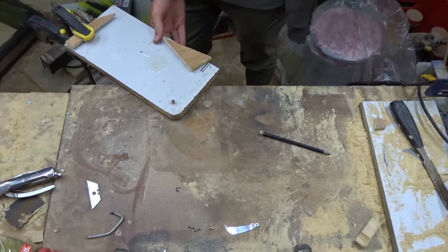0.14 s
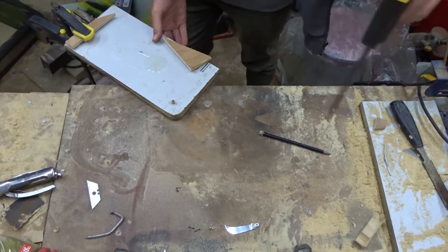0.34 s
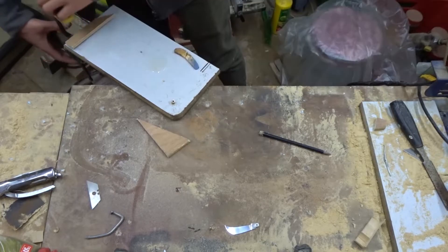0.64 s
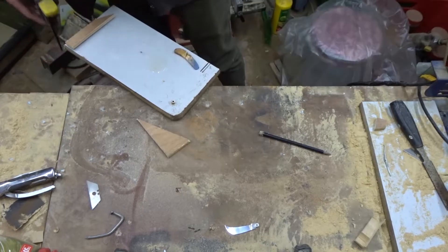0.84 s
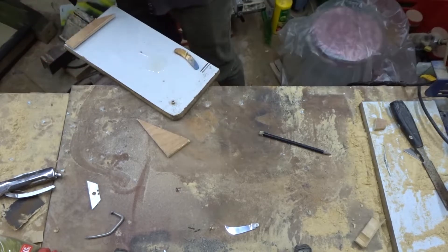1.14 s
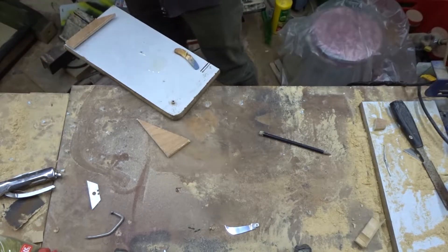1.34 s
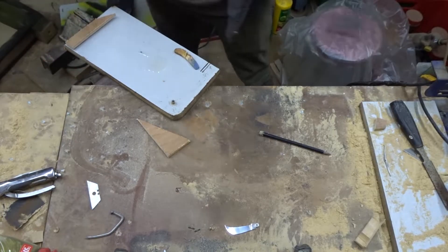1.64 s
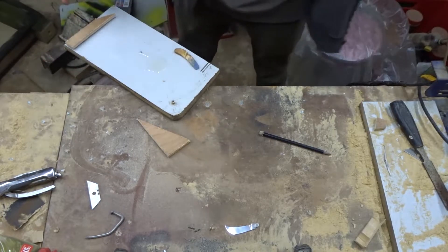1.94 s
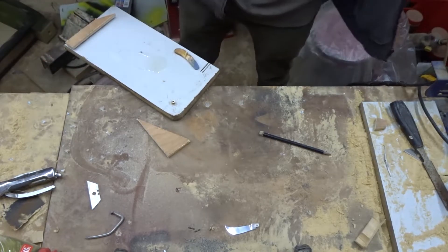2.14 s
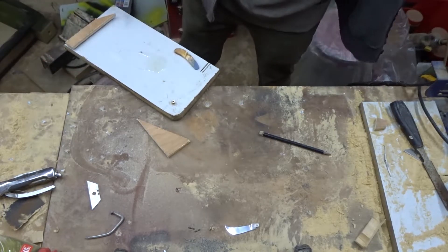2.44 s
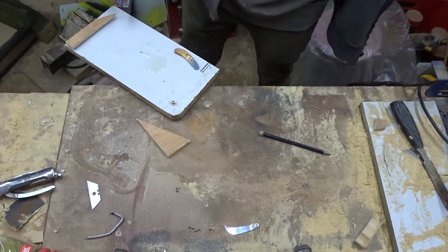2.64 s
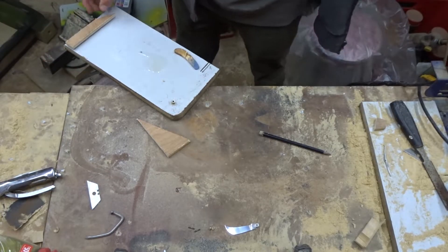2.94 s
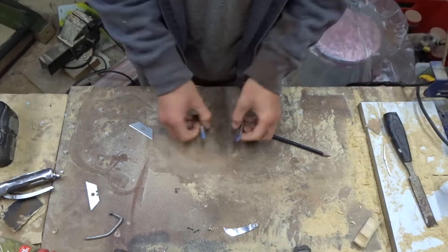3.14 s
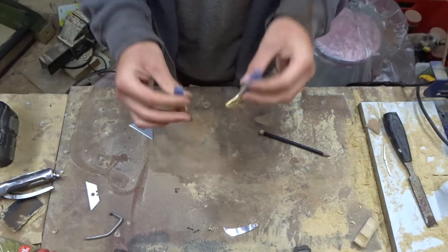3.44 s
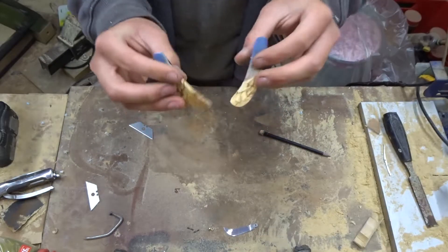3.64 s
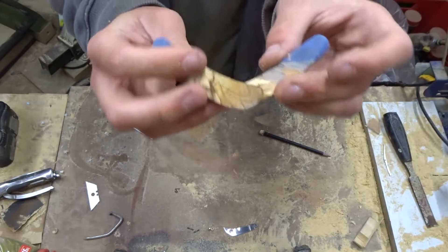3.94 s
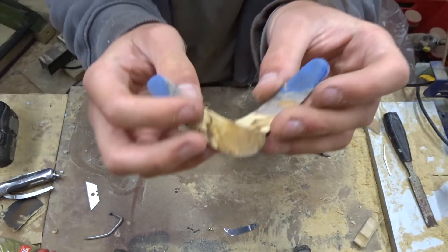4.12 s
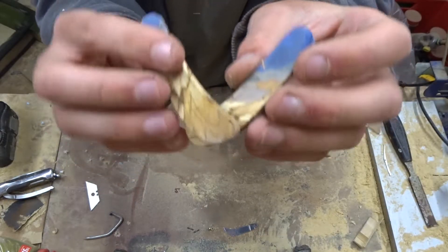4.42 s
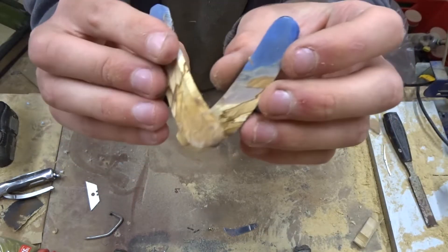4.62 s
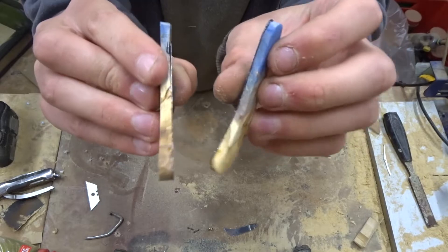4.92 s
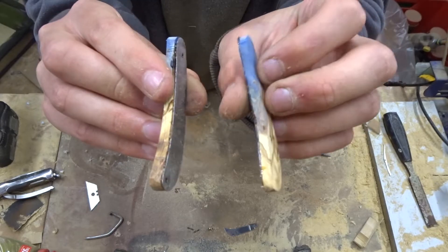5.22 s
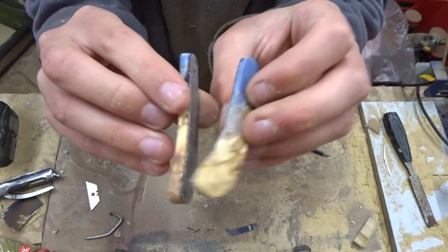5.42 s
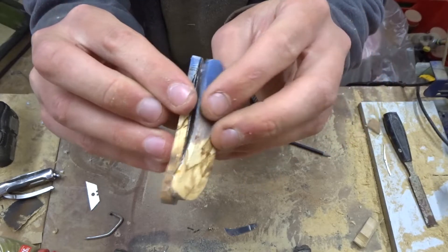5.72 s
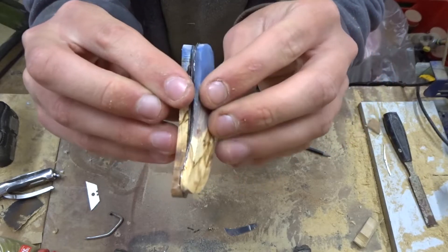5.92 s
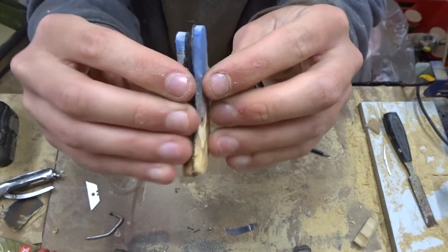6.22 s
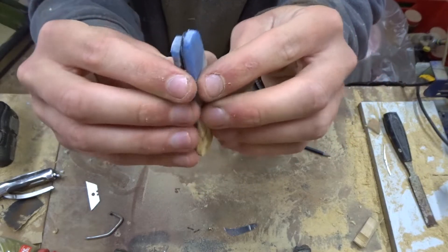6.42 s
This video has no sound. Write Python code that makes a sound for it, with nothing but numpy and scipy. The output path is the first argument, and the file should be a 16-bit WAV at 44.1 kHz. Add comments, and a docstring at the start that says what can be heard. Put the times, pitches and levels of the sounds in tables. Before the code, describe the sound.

In a small workshop, a clamp snaps, wood rattles down hard on a bench, then faint close clicks of small wooden slips over room air.

```python
"""A small workshop: clamps and pieces of wood are dropped on a workbench; each lands, chatters and shakes the bench.
Later two thin slips of wood are rubbed and clicked together close to the microphones, over the quiet room air.
Blows and strokes are random tiny contacts that ring a filter of resonances; the bench adds decaying low modes.
Shaped noise makes the air and the brush of fingers, a wavering sine a faint squeak, sparse echoes the room."""
import sys
import numpy as np
from scipy import signal
from scipy.io import wavfile
from scipy.ndimage import uniform_filter1d

SR = 44100
rng = np.random.default_rng(int(sys.argv[2]) if len(sys.argv) > 2 else 0)


def store_pcm(level_fs):
    """Save levels as 16-bit WAV."""
    pcm = np.round(np.clip(level_fs, -1, 1) * 32767).astype(np.int16)
    wavfile.write(sys.argv[1], SR, np.atleast_2d(pcm).T)


def voltage_ratio(decibels):
    """Convert decibels (scalar or array-like) to amplitude ratios, 20 dB per decade."""
    exponent = np.asarray(decibels, float) / 20
    return 10 ** exponent


N = 289737
BENCH_STOP_S = 3.186  # the bench sound stops short and the air changes colour


def evened(x):
    """Scales to rms 1."""
    return x / np.sqrt(np.mean(x ** 2) + 1e-20)


def read(points, hz):
    """Reads a table on a log-frequency axis."""
    f, value = np.transpose(points)
    return np.interp(np.log(hz + 1), np.log(f + 1), value)


def add(mix, s, sound):
    """Mixes a sound in at time s."""
    part = mix[..., round(s * SR):][..., :sound.shape[-1]]
    part += sound[..., :part.shape[-1]]


def response(rings, colour, broad_db):
    """Causal impulse response of resonances standing on a broad colour."""
    hz = abs(np.fft.fftfreq(8192, 1 / SR))
    power = voltage_ratio(2 * (read(colour, hz) + broad_db)) + 1e-9
    for f, width_hz, db in rings:
        power += voltage_ratio(2 * db) / (1 + (2 * (hz - f) / width_hz) ** 2) ** 2
    log_gain = np.log(power) / 2
    spectrum = np.exp(log_gain - 1j * signal.hilbert(log_gain).imag)  # minimum phase
    return np.fft.ifft(spectrum).real[:4096]


def contacts(count, per_s, spread_db):
    """Tiny contacts at random moments, of random sign; a few are large."""
    when, size, sign = rng.random((count, 3)).T
    return (when < per_s / SR) * voltage_ratio(-spread_db * np.log(size + .02)) * np.sign(sign - .5)


def panned(x, pan_db):
    """Two channels, the nearer one louder; close reflections reach them unlike, as a short treble scatter."""
    t = np.arange(2500) / SR
    scatter = rng.standard_normal(len(t)) * voltage_ratio(-60 * t / .04)
    highpass = signal.butter(1, 3000, "high", fs=SR)
    scatter = signal.lfilter(*highpass, scatter / np.linalg.norm(scatter))
    side = voltage_ratio(0.24) * signal.fftconvolve(x, scatter)[:len(x)]
    return np.array([x + side, x - side]) * voltage_ratio(np.array([[pan_db], [-pan_db]]) / 2)


def drag(rows, ring, per_s, pan_db):
    """Grit slips under a stroke: dense contacts through the body; gives start and sound."""
    s, db = np.transpose(rows)
    t = np.arange(s[0], s[-1], 1 / SR)
    grit = signal.fftconvolve(contacts(len(t), per_s, spread_db=1.0), ring)[:len(t)]
    stroke = evened(grit) * voltage_ratio(np.interp(t, s, db)) * signal.windows.tukey(len(t), .02)
    return s[0], panned(stroke, pan_db)


def bench_ring(hardness_hz, free, rock_t60):
    """The bench top rocks for a moment after a push; a soft push reaches only the low modes."""
    # bench modes: f/Hz (drawn within 1.5 %), level/dB, free t60/s
    modes = [(30, -27, .3), (50, -22.5, .2), (82.2, -11.5, 0.36), (101, -2.5, 0.2), (128, -4.5, 0.25),
             (161, -11.5, 0.29), (197, -16, 0.45), (260, -10.5, 0.095), (300, -4, 0.32), (348, -4.5, 0.38),
             (436, -10, .2), (580, -11, 0.28), (714, -20.5, .15)]
    t = np.arange(SR // 2) / SR
    ring = np.zeros(len(t))
    for hz, db, t60 in modes:
        share, turn = rng.random(2)
        decay = voltage_ratio(db - 60 * t / (t60 * free))
        tone = np.sin(2 * np.pi * hz * (.985 + .03 * turn) * t)
        ring += decay * tone * (0.6 + share) / (1 + (hz / hardness_hz) ** 2)
    ring *= 1 - np.exp(-t * hardness_hz)  # soft pushes build up slowly
    rocking = contacts(len(t), per_s=130, spread_db=1.5) * voltage_ratio(-60 * t / rock_t60)
    rocking[0] = 2.2  # the push itself
    ring = signal.fftconvolve(rocking, ring)[:len(t)]
    return ring / abs(ring).max()


def blows(rows, body, broad_db, per_s, spread_db, touch, split_hz, rise_s, pan_db, thump_db, treble_life):
    """Each blow is a chatter of contacts that holds, dies and rings the object, and a thump in the bench."""
    out = np.zeros((2, N))
    ring = response(*body, broad_db)
    lowpass = signal.butter(2, split_hz, fs=SR)
    t = np.arange(SR // 3) / SR
    for s, level_db, hold_s, t60, treble_db in rows:
        fade_db = -60 * np.maximum(t - hold_s, 0) / t60
        shape = voltage_ratio(fade_db) * (1 - np.exp(-t / rise_s))
        chatter = contacts(len(t), per_s, spread_db) * shape
        chatter[0] = touch  # first touch
        # hard contacts are bright, soft ones dull; treble dies sooner
        dull = signal.lfilter(*lowpass, chatter)
        treble_gain = voltage_ratio(treble_db + fade_db * (1 / treble_life - 1))
        sound = signal.fftconvolve(dull + treble_gain * (chatter - dull), ring)
        sound *= voltage_ratio(level_db) * np.linalg.norm(shape) / np.linalg.norm(sound)
        add(out, s, panned(sound, pan_db))
        thump = bench_ring(hardness_hz=400, free=0.74, rock_t60=t60 + 3 * hold_s)
        add(out, s, voltage_ratio(level_db + thump_db) * thump)
    return out


def patchy_noise():
    """Two-channel noise spectrum, alike in the bass and unlike in the treble, and slow random patches."""
    # left-right likeness of the noise: f/Hz, coherence (0 to 1)
    likeness = [(60, 0.98), (170, 0.94), (480, 0.15), (1360, 0.0027), (3860, 0.015), (10900, 0)]
    frames, hz = N // 256 + 5, np.fft.rfftfreq(1024, 1 / SR)
    a, b, c, d, patches = rng.standard_normal((frames, 513, 5)).T
    patches = uniform_filter1d(patches, size=8, axis=0)
    patches = evened(uniform_filter1d(patches, size=12, axis=1))
    same = np.clip(read(likeness, hz), -1, 1)[:, None]
    left = a + 1j * b
    right = same * left + np.sqrt(1 - same ** 2) * (c + 1j * d)
    return hz, np.arange(frames) * 256 / SR, np.array([left, right]), patches


def noise_sound(spectrum):
    """Overlap-adds a noise spectrum into sound of rms 1."""
    return evened(signal.istft(spectrum, nperseg=1024, noverlap=768)[1][:, :N])


def air(hz, t, noise, patches):
    """Room air and microphone hiss: coloured, slightly patchy noise."""
    # air colour up to the bench stop: f/Hz, relative level/dB per Hz
    early_colour = [(12, -37), (20, -6), (93, -7.5), (158, -11.5), (506, -12), (1010, -18), (1280, -18),
                    (1500, -17), (3680, -23), (3990, -22.5), (4670, -24), (10300, -30), (11200, -37.5),
                    (14600, -64), (22000, -120)]
    # air colour after it: f/Hz, relative level/dB per Hz
    late_colour = [(12, -30), (20, 0), (42, -7), (171, -17.5), (206, -17.5), (398, -12.5), (533, -17),
                   (772, -20.5), (1210, -22), (1500, -17.5), (1660, -19.5), (2750, -23.5), (4550, -25.5),
                   (5060, -26), (11200, -33), (14600, -69.5), (22000, -120)]
    # gain of the air: t/s, gain/dB
    gain_rows = [(0.0, -64), (0.899, -65.5), (1.3, -62.5), (2.2, -63.5), (2.42, -59), (3.3, -62.5),
                 (3.771, -62), (5.29, -65), (6.57, -62.5)]
    early_db, late_db = read(early_colour, hz)[:, None], read(late_colour, hz)[:, None]
    colour_db = np.where(t < BENCH_STOP_S, early_db, late_db)
    hiss = noise_sound(noise * voltage_ratio(colour_db + 1.6 * patches))
    return hiss * voltage_ratio(np.interp(np.arange(N) / SR, *np.transpose(gain_rows)))


def brush(hz, t, noise, patches):
    """Fingers brush the slips: a faint swelling band of hiss."""
    # hiss band: centre f/Hz, width/Hz (Gaussian sigma), overall rms/dB
    hiss_band = (4200, 650, -84.5)
    # course of the brushing: t/s, relative level/dB
    swell_rows = [(4.4, -20), (5.2, -10), (5.8, 5), (6.15, -4.5), (6.6, -4)]
    f, width_hz, db = hiss_band
    swell = voltage_ratio(np.interp(t, *np.transpose(swell_rows)) + 2 * patches)
    band = np.exp(-.5 * ((hz - f) / width_hz) ** 2)[:, None]
    return voltage_ratio(db) * noise_sound(noise * band * swell)


def room(x):
    """Sparse echoes of random sign, other ones for each channel, each band dying at its own speed."""
    # reverberation: f/Hz, t60/s
    decay = [(100, 0.52), (400, 0.53), (1500, 0.25), (5000, .25), (11000, 0.27)]
    taps = np.zeros((2, SR))
    at = np.arange(130, SR - 20, 20) + rng.integers(0, 20, (2, (SR - 131) // 20))
    np.put_along_axis(taps, at, rng.choice([-1., 1.], at.shape), 1)
    mid = taps[0]
    side = taps[1] - np.convolve(taps[1], np.hanning(61) / 30, "same")  # bass is the same on both sides
    hz, t, z = signal.stft([mid + .8 * side, mid - 0.33 * side], SR, nperseg=256)
    tail = signal.istft(z * voltage_ratio(-60 * t / read(decay, hz)[:, None]), SR, nperseg=256)[1]
    return signal.fftconvolve(x.mean(0)[None], tail / np.linalg.norm(tail[0]), axes=1)[:, :N]


def squeak():
    """A thin, faint, slightly unsteady sine tone; gives start and sound."""
    # squeak: start/s, end/s, f/Hz, peak/dB
    tone_row = (5.86, 6.05, 3700, -75)
    start, end, hz, db = tone_row
    t = np.arange(start, end, 1 / SR)
    waver = 1 + 0.0051 * evened(uniform_filter1d(rng.standard_normal(len(t)), size=600))
    tone = np.sin(2 * np.pi * np.cumsum(hz * waver) / SR)
    return start, voltage_ratio(db) * tone * signal.windows.tukey(len(t), .4)


def scuffs():
    """Things dragged over the bench top: strokes of grit that swell and fade by 20 dB."""
    # strokes: start/s, loudest/s, end/s, level/dB
    strokes = [(0.0, -0, 0.22, -68), (0.174, 0.22, 0.34, -64.5), (0.25, 0.292, 0.39, -65),
               (1.047, 1.24, 1.61, -59.5), (1.596, 1.698, 1.71, -62), (1.968, 2.033, 2.06, -68),
               (2.604, 2.701, 2.75, -57), (4.03, 4.1, 4.19, -75.5)]
    # grit colour: f/Hz, level/dB per Hz
    colour = [(290, -24), (500, -2.5), (1020, -9), (1910, -4), (2290, -0.5), (4170, -1.5), (7290, -9.5),
              (8630, -9), (11200, -14), (14600, -51.5), (22000, -120)]
    out, grit = np.zeros((2, N)), response([], colour, broad_db=4.5)
    for start, top, end, db in strokes:
        stroke = [(start, db - 20), (top, db), (end, db - 20)]
        add(out, *drag(stroke, grit, per_s=3000, pan_db=-1.5))
    return out


def bumps():
    """Soft bumps that reach only the bench and leave it rocking."""
    # bumps: t/s, peak/dB, hardness/Hz, rocking t60/s, share of the free ring time left by the hand on it
    rows = [(0.465, -50.5, 40.3, 0.98, .4), (0.521, -52, 450, 0.92, 0.69), (1.296, -49, 400, 0.18, 0.45),
            (1.544, -42.5, 190, .3, 0.45), (1.616, -47.5, 120, .2, .6), (1.651, -44.5, 140, .25, 0.45),
            (1.689, -46.5, 120, .35, 0.5), (2.429, -33, 300, 0.25, 0.55), (2.536, -36, 400, 0.78, 0.32),
            (2.884, -30.5, 250, 0.45, 0.78), (2.997, -43.5, 455, 0.48, 0.38),
            (3.082, -40.5, 450, 0.55, 0.32)]
    out = np.zeros((2, N))
    for s, peak_db, hardness_hz, rock_t60, free in rows:
        add(out, s, voltage_ratio(peak_db) * bench_ring(hardness_hz, free, rock_t60))
    return out


def rub():
    """Wood slides on wood: dense contacts ring the slips; gives start and sound."""
    # stroke: t/s, level/dB
    stroke = [(3.186, -39), (3.192, -53.5), (3.35, -56.5), (3.466, -69.5), (3.75, -77)]
    # rings: f/Hz, width/Hz, level/dB; colour: f/Hz, level/dB per Hz
    body = ([(564, 65, 4), (832, 150, 3.5), (1910, 240, 4.5), (2700, 290, -1), (4810, 1100, -3.5),
            (8500, 800, -9.5), (10440, 700, -10)], [(88, -49), (150, -1), (550, -1), (761, -6), (833, -6),
            (1380, -7), (1950, -2.5), (11200, -20), (14600, -64.5), (22000, -120)])
    return drag(stroke, response(*body, broad_db=1.0), per_s=4900, pan_db=-2.5)


def slips():
    """Thin slips click together: very short chatters, broad rings, hardly any bench."""
    # blows: t/s, level/dB, chatter hold/s, chatter t60/s, treble/dB
    rows = [(5.4945, -48.5, 0.0011, 0.014, -12.5), (5.7577, -53.5, .001, .018, -16),
            (6.2759, -35, 0.00069, 0.01, 4), (6.553, -49, 0.0018, 0.016, 0)]
    # rings: f/Hz, width/Hz, level/dB; colour: f/Hz, level/dB per Hz
    body = ([(1500, 210, 0), (2280, 320, 1.5), (2840, 390, 5), (3670, 370, 3), (4750, 500, -11),
            (7250, 1200, 1), (10680, 900, 2)], [(290, -64.5), (500, -17), (1430, -12), (2410, -11.5),
            (2780, -7), (7390, -1.5), (11200, -21), (14600, -43), (22000, -120)])
    return blows(rows, body, broad_db=3.5, per_s=3900, spread_db=4.0, touch=2.8, split_hz=3400,
                 rise_s=0.00051, pan_db=-1.5, thump_db=-60, treble_life=0.69)


def board():
    """A board lands: chatter with a slow rise, low rings and a strong bench thump; the last two rows are later
    light thuds by hand through the same rings."""
    # blows: t/s, level/dB, chatter hold/s, chatter t60/s, treble/dB
    rows = [(1.653, -58, 0.0069, .1, 1), (1.864, -53.5, 0.026, 0.32, -0.5),
            (2.696, -41.5, 0.0052, 0.029, -2), (2.707, -31.5, 0.011, 0.16, 1.5),
            (2.735, -39.5, .035, .08, -4.5), (2.775, -42, 0.021, 0.19, -5.5), (4.425, -62.5, .02, .06, 14),
            (4.478, -63, 0.02, .1, 10.5)]
    # rings: f/Hz, width/Hz, level/dB; colour: f/Hz, level/dB per Hz
    body = ([(330, 96, 0.5), (860, 41, -5.5), (1120, 49, -8), (1241, 67, -11), (1400, 43, -12.5),
             (1680, 33, -11), (2020, 56, -7), (2335, 63, -22), (2690, 35, -16), (3710, 48, -26.5)],
             [(88, -40.5), (150, -11), (211, -2), (303, -9), (521, -3.5), (721, -6.5), (1540, -10.5),
             (2170, -14.5), (11200, -53), (14600, -84.5), (22000, -120)])
    return blows(rows, body, broad_db=-3.0, per_s=3900, spread_db=1.5, touch=0.67, split_hz=1200,
                 rise_s=0.0033, pan_db=-1.7, thump_db=-3.5, treble_life=.7)


def jaw():
    """A jaw lands: very dense contacts through its rings, with a bench thump."""
    # blows: t/s, level/dB, chatter hold/s, chatter t60/s, treble/dB
    rows = [(2.865, -26, 0.011, 0.061, 0), (2.884, -33.5, 0.013, .2, 0)]
    # rings: f/Hz, width/Hz, level/dB; colour: f/Hz, level/dB per Hz
    body = ([(405, 57, -5.5), (705, 160, -8), (860, 29, -25), (1326, 220, -20.5), (2190, 42, -20),
             (2425, 33, -15.5), (3000, 35, -24.5), (3020, 28, -31), (2790, 150, -11), (3663, 300, -12),
             (5310, 280, -26.5), (6784, 160, -39)], [(120, -24.5), (200, -6), (379, -9), (480, -5.5),
             (639, -1), (1040, -13), (2190, -11.5), (3390, -2.5), (4820, -22.5), (11200, -47), (14600, -67),
             (22000, -120)])
    return blows(rows, body, broad_db=-9.5, per_s=11000, spread_db=4.0, touch=3.2, split_hz=2100,
                 rise_s=0.00079, pan_db=-1.2, thump_db=-11.5, treble_life=0.79)


def wedge():
    """A wedge lands once: a chatter through its rings, with a bench thump."""
    # blows: t/s, level/dB, chatter hold/s, chatter t60/s, treble/dB
    rows = [(0.423, -43.5, 0.038, 0.23, 2)]
    # rings: f/Hz, width/Hz, level/dB; colour: f/Hz, level/dB per Hz
    body = ([(525, 15, 5), (826, 51, 4.5), (1240, 31, 0), (2236, 31, -5), (3310, 37, -10), (4047, 110, 2),
             (4430, 27, -16), (5570, 82, -5.5)], [(120, -42), (200, -14.5), (505, -2), (707, -12.5),
             (880, -4.5), (2080, -12.5), (3940, -8), (4820, -17), (11200, -31.5), (14600, -61.5),
             (22000, -120)])
    return blows(rows, body, broad_db=1.0, per_s=7900, spread_db=3.5, touch=2.0, split_hz=2000,
                 rise_s=0.00042, pan_db=-0.5, thump_db=-5.5, treble_life=.8)


def block():
    """A block chatters: loud, quick blows of nearly even contacts, with a bench thump."""
    # blows: t/s, level/dB, chatter hold/s, chatter t60/s, treble/dB
    rows = [(2.257, -20, 0.0099, 0.036, 4), (2.273, -21.5, 0.017, 0.028, 1.5),
            (2.297, -19, 0.0073, 0.06, -3), (2.308, -25, 0.028, 0.054, -5.5), (2.34, -19, 0.0069, 0.038, 0),
            (2.352, -26, 0.0088, .2, -7)]
    # rings: f/Hz, width/Hz, level/dB; colour: f/Hz, level/dB per Hz
    body = ([(420, 48, -1), (792.6, 44, 1), (1198, 40, -2.5), (1314, 120, 1.5), (1720, 87, -5),
            (1906, 19, -8), (2548, 180, -1.5), (2570, 110, -5), (2754, 73, -5.5), (3400, 70, -19),
            (3740, 120, -13.5), (5160, 34, -22.5), (6900, 31, -29)], [(120, -38.5), (200, -4), (434, -2),
            (719, -1.5), (783, -4.5), (2150, -6), (2460, -4.5), (11200, -37.5), (14600, -77),
            (22000, -120)])
    return blows(rows, body, broad_db=-6.5, per_s=6000, spread_db=0.5, touch=1.0, split_hz=1100,
                 rise_s=.0015, pan_db=-2.0, thump_db=-10.5, treble_life=0.97)


def clamp():
    """The clamp jaw slides off before it snaps: a stroke and blows through the same rings."""
    # blows: t/s, level/dB, chatter hold/s, chatter t60/s, treble/dB
    rows = [(0.873, -47, 0.067, 0.11, -9.5), (0.93, -39, 0.059, .1, 1), (0.973, -32.5, 0.012, 0.061, -3.5),
            (0.984, -20, 0.0066, 0.062, -1), (0.991, -21, 0.015, 0.034, -0.5),
            (1.008, -21, 0.013, .17, 3.5), (1.274, -50.5, 0.025, 0.12, 5), (1.329, -48.5, 0.0064, 0.16, -3)]
    # rings: f/Hz, width/Hz, level/dB; colour: f/Hz, level/dB per Hz
    body = ([(1010, 140, -7.5), (1994, 150, -6.5), (2130, 130, -5.5), (2624, 73, -2.5), (2917, 90, -2),
             (3530, 59, -2), (3300, 130, -7), (4060, 190, -3.5), (5980, 71, -10.5), (5830, 67, -16),
             (7450, 69, -12.5), (8540, 33, -15)], [(120, -60), (200, -27), (271, -30), (629, -12.5),
             (991, -5.5), (1280, -13), (1360, -9), (2810, -3.5), (7350, -18.5), (11200, -31),
             (14600, -59.5), (22000, -120)])
    # slide: t/s, level/dB
    slide = [(0.82, -76), (0.872, -53.5), (0.98, -40), (0.99, -39.5)]
    out = blows(rows, body, broad_db=1.0, per_s=6800, spread_db=5.5, touch=3.0, split_hz=2300,
                rise_s=0.0014, pan_db=0.1, thump_db=-42, treble_life=.8)
    add(out, *drag(slide, response(*body, broad_db=1.5), per_s=3200, pan_db=3.0))
    return out


def scene():
    """Bench work that stops short with its echoes; scuffs, slips and later hand thuds are not cut."""
    t = np.arange(N) / SR
    later = t > BENCH_STOP_S
    boards = board()
    bench = wedge() + clamp() + block() + jaw() + bumps() + boards * ~later
    bench += voltage_ratio(-9.5) * room(bench)
    bench *= np.clip((BENCH_STOP_S - t) / 0.0039, 0, 1)
    uncut = slips() + scuffs() + boards * later
    add(uncut, *squeak())
    add(uncut, *rub())
    noise = patchy_noise()
    return bench + uncut + voltage_ratio(-3.0) * room(uncut) + air(*noise) + brush(*noise)


def low_pass(x):
    """Removes everything above the highest recorded frequency."""
    return signal.sosfilt(signal.butter(12, 11520, fs=SR, output="sos"), x)


def record(dry):
    """Limits the band to 11.2 kHz with a steep linear-phase low-pass."""
    edge = signal.firwin(511, 11200, window=("kaiser", 9), fs=SR)
    mix = signal.oaconvolve(dry, edge[None], "same")
    return low_pass(mix)


dry = scene()
out = record(dry)
store_pcm(out)
```